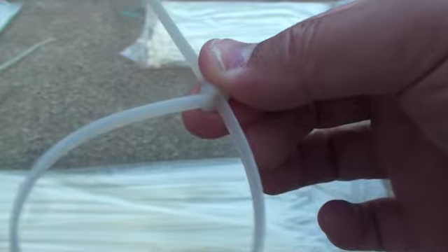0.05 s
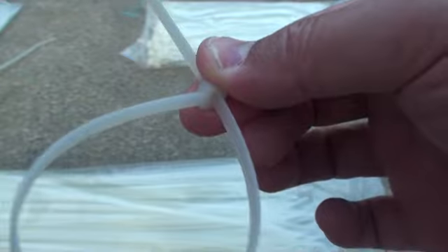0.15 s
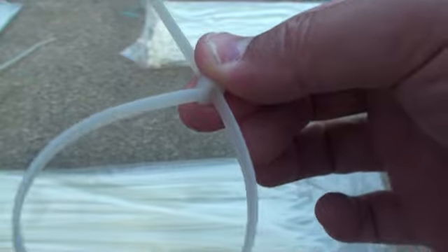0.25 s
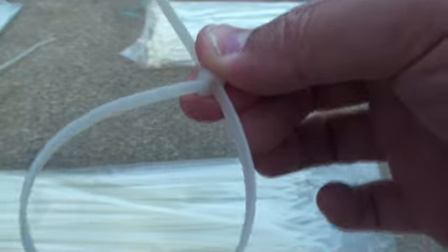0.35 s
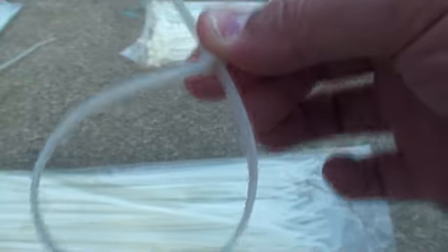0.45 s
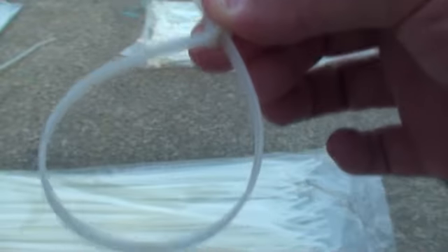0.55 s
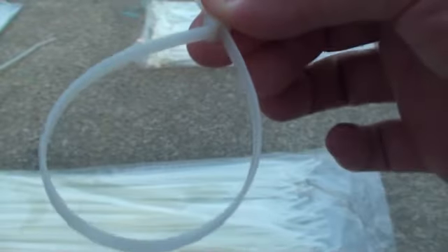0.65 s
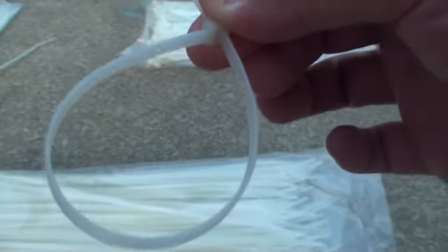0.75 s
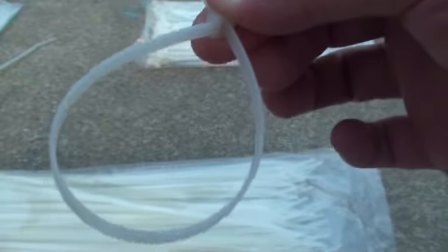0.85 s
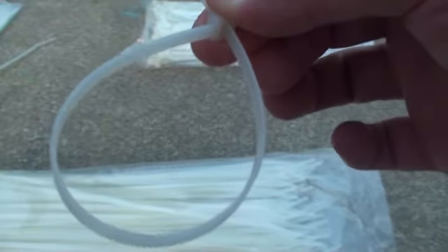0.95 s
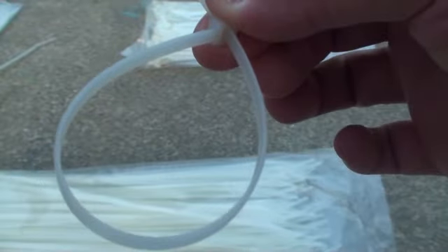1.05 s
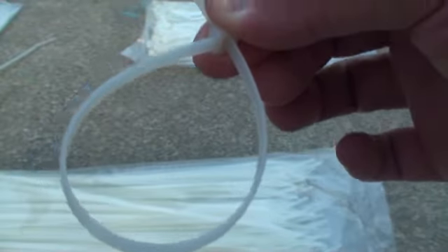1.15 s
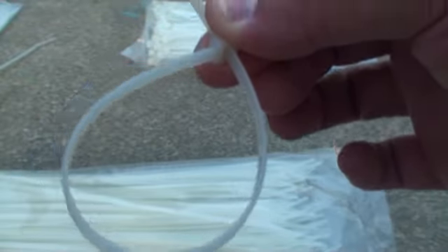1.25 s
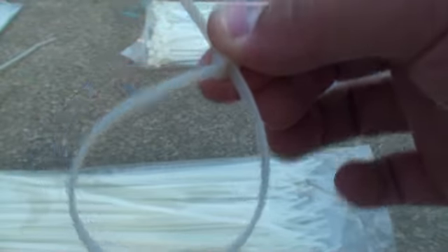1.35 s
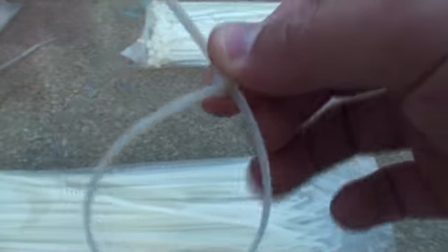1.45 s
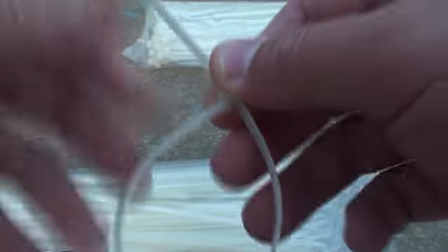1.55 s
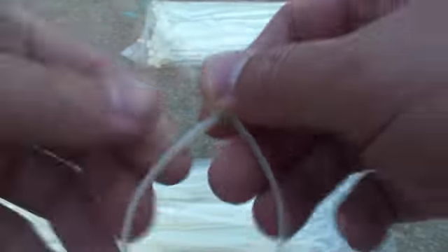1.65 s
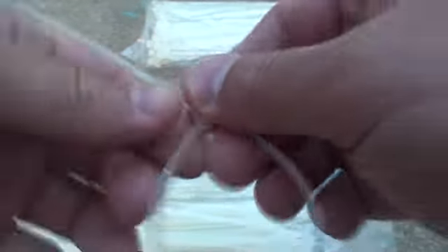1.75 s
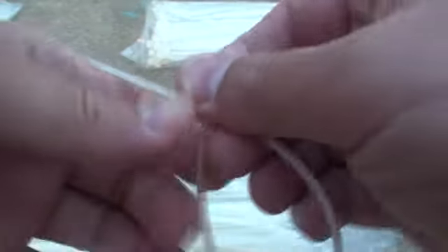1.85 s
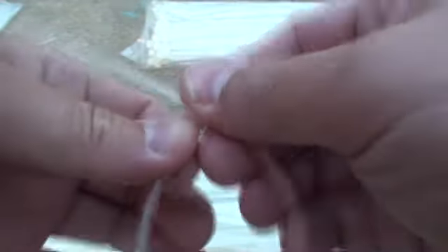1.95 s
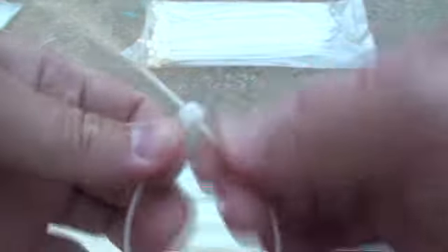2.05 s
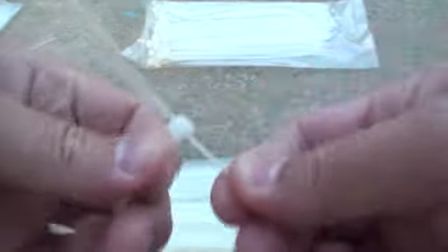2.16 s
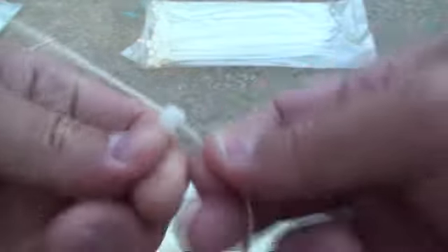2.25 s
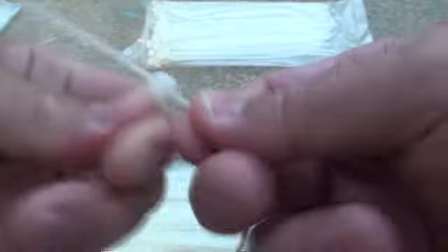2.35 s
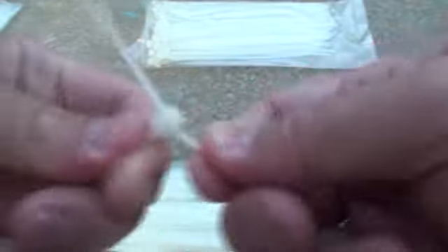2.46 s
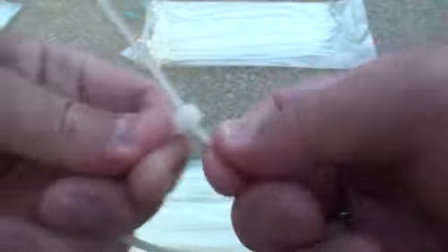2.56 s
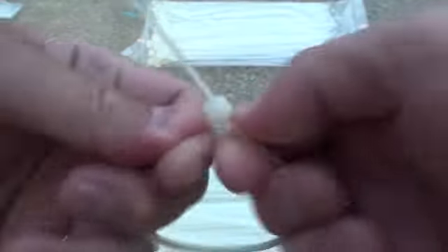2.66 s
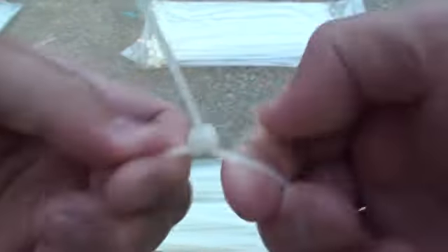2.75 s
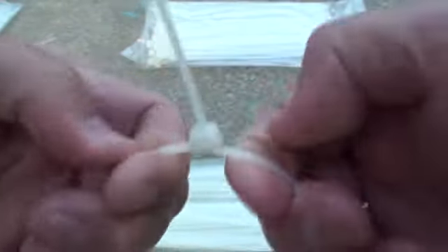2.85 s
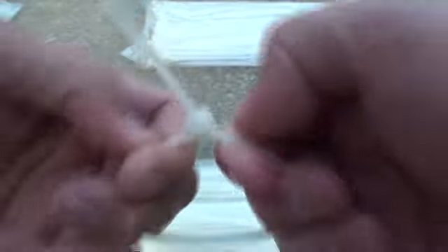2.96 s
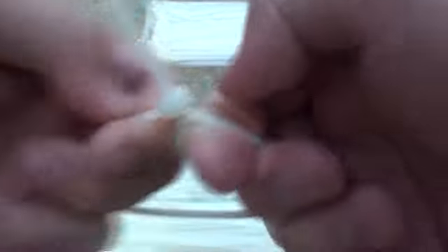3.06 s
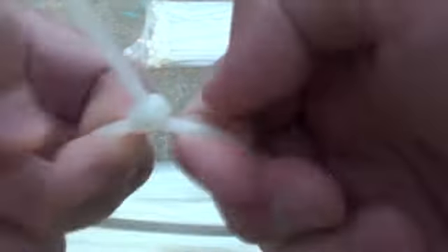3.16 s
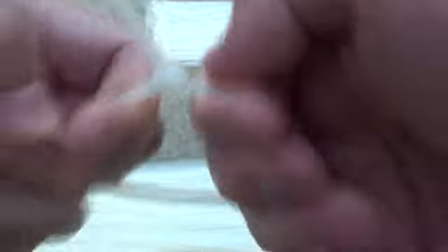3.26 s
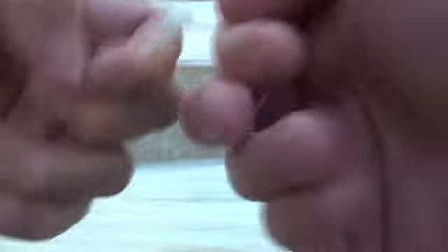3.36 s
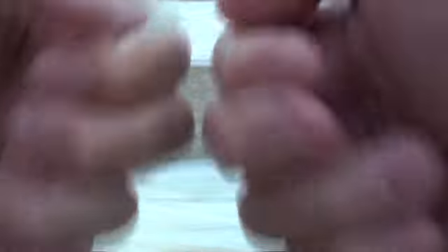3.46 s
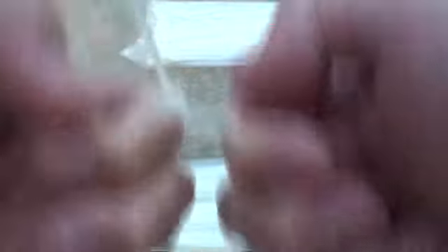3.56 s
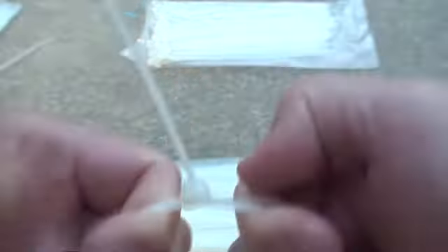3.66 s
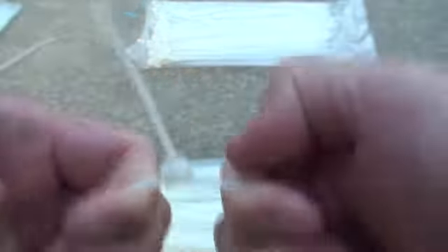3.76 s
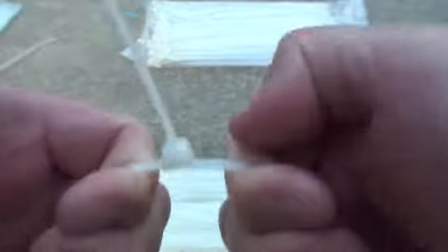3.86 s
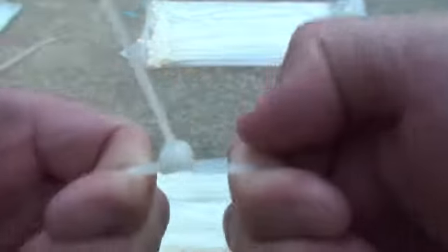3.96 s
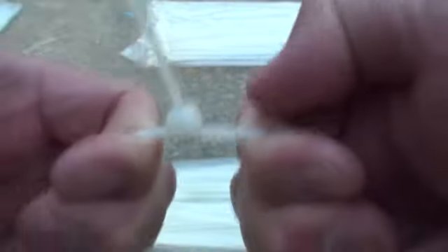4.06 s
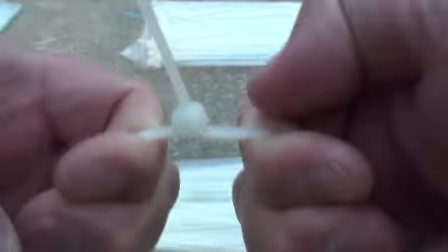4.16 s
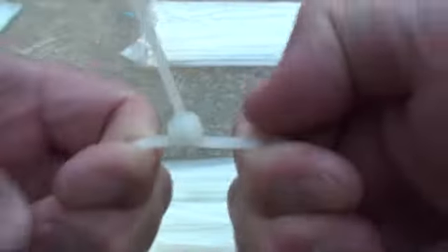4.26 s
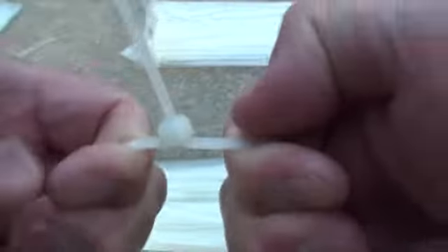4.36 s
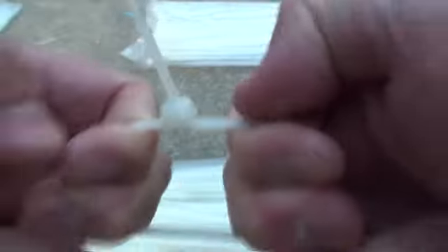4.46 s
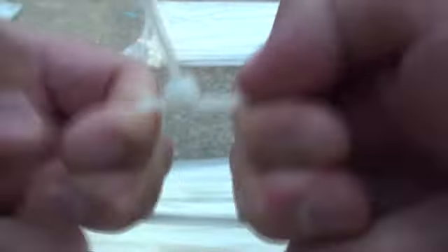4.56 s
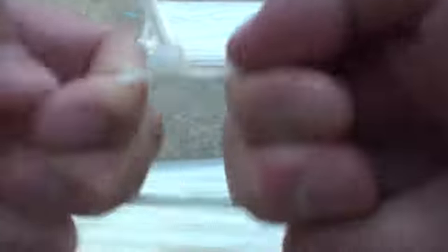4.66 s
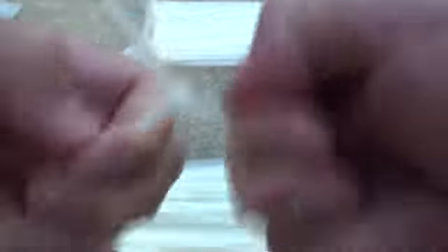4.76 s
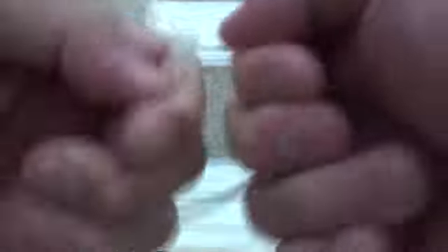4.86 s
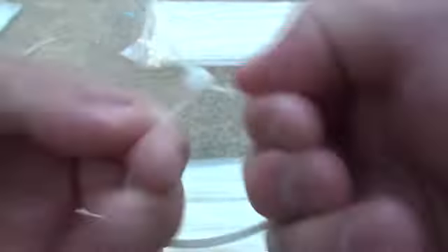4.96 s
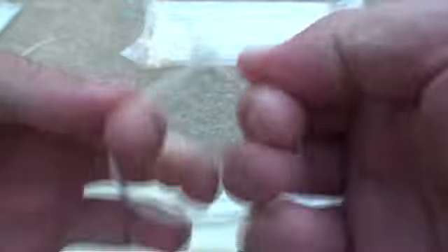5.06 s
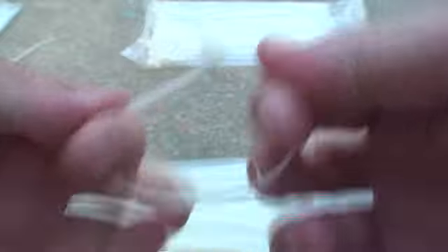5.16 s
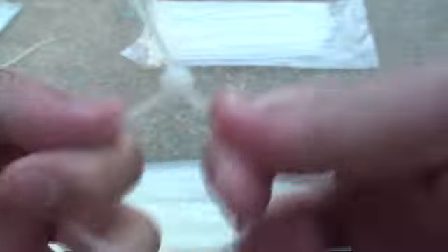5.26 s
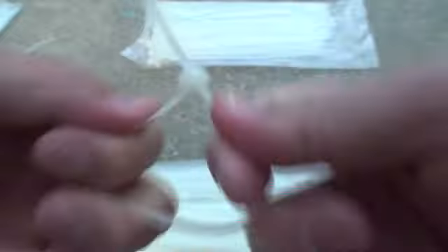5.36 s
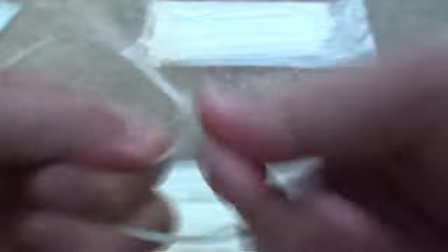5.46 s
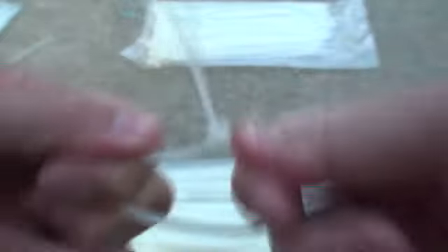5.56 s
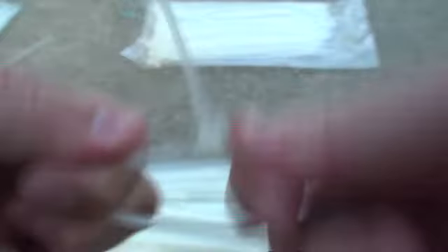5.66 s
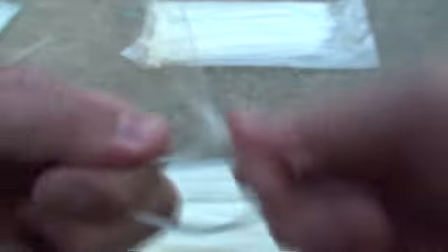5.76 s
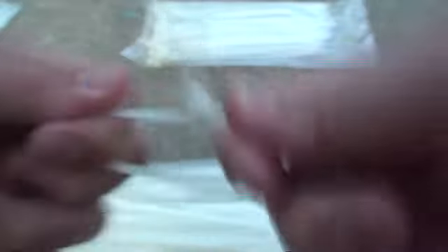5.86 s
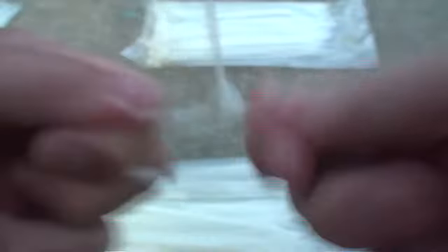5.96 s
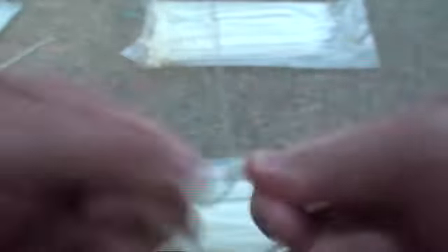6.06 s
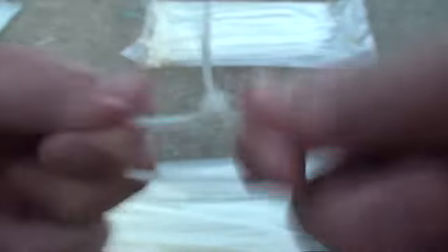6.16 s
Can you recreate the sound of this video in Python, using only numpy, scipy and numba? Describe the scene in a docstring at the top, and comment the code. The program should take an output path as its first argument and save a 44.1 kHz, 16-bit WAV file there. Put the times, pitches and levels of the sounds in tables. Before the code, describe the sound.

Hard plastic teeth snap rapidly in five separate pulls during the first second and a half, dry and treble-heavy near the microphone. Quiet skin-on-nylon rubbing follows, with a brief tight zip, a clear finger knock, dull little bumps and a sharp strap flick trailing hiss. A low hum and gentle wash stay steady underneath, with a far bird repeating burrs and thin rising whistles in the second half.

```python
"""A nylon zip tie is pulled through its head close by: the pawl snaps over the teeth in short bursts, each tooth
striking a bank of damped resonances. Fingers tap, bump and flick the strap (dying filtered noise) and rub it
(grainy noise with a bright band). Behind lie a low machine hum (resonant noise), the wash of the surroundings
(coloured noise), a far songbird and soft hoots (gliding or steady tones mixed with narrow noise)."""
import sys
import numpy as np
from scipy import signal
from scipy.fft import rfft, irfft
from scipy.io import wavfile
from scipy.ndimage import uniform_filter1d
from numba import njit

SR = 44100
rng = np.random.default_rng(int(sys.argv[2]) if len(sys.argv) > 2 else 0)


def generate_wav(sig):
    """Save sig (samples, or channels by samples) to the path in sys.argv[1] as 16-bit PCM at SR."""
    pcm = np.round(np.clip(np.atleast_2d(sig).T, -1, 1) * 32767).astype(np.int16)
    wavfile.write(sys.argv[1], SR, pcm)


N = 273861
LEAD_S = .01  # head start of the close sounds, so a click just before time zero still rings out


def undb(db):
    """Decibels to gain."""
    return 10 ** (np.asarray(db) / 20)


def level(x, rms_db):
    """Scale to an rms level."""
    return x * undb(rms_db) / np.sqrt(np.mean(x ** 2))


def pan(x, pan_db):
    """One signal on two channels, left louder by pan_db."""
    return x * undb(np.array([[pan_db], [-pan_db]]) / 2)


def pair(length, like):
    """Left and right noise with the given likeness, 0-1."""
    mid, side = rng.standard_normal((2, length))
    like = np.clip(like, 0, 1)
    return np.sqrt((1 + like) / 2) * mid + np.sqrt((1 - like) / 2) * side * np.array([[1], [-1]])


def add(out, x, start_s):
    """Mix x into out from start_s on, cropped to fit."""
    i = int(round(start_s * SR))
    a, b = max(i, 0), min(i + x.shape[-1], out.shape[-1])
    out[..., a:b] += x[..., a - i:b - i]


def walk(rate_hz):
    """Random levels held 1 / rate_hz and smoothed twice; spread near 1."""
    hold = int(SR / rate_hz)
    steps = np.repeat(rng.standard_normal(N // hold + 1), hold)
    return 2.3 * uniform_filter1d(uniform_filter1d(steps, hold), hold)[:N]


@njit
def svf(x, hz, q):
    """State-variable band-pass with a moving centre, gain 1 there."""
    y, band, low, damping = np.empty(len(x)), 0., 0., 1 / q
    for i in range(len(x)):
        g = np.tan(np.pi * hz[i] / SR)
        v = (band + g * (x[i] - low)) / (1 + g * (g + damping))
        band, low, y[i] = 2 * v - band, low + 2 * g * v, damping * v
    return y


def resonate(x, hz, q):
    """Band-pass with a fixed centre."""
    return svf(x, np.full(len(x), 1. * hz), 1. * q)


def mode(f, hz, width_hz, db):
    """Frequency response of one damped resonance."""
    return undb(db) * 1j * f * width_hz / (hz ** 2 - f ** 2 + 1j * f * width_hz)


def ratchet():
    """Each tooth gives two blows to the damped head: the pawl slips off, then lands in the next gap and bounces."""
    # resonances of the head before grip and scatter: centre_hz, width_hz, relative_db
    head = [(1100, 560, -48), (2290, 900, -24), (4100, 640, -32.5), (5440, 600, 2.5), (7070, 1380, 9.5),
            (9470, 1350, 15), (11200, 2100, 7.5), (12500, 1380, -3.3), (14600, 1200, -9.5)]
    # the strap loop recoils against the head: centre_hz, width_hz, relative_db
    loop = (300, 400, -38)
    # pulls of the strap: mean click_energy_db, mean flight_ms from slip to landing,
    # grip (factor on the head's resonances), [times_s at which the pawl clears a tooth]
    pulls = [(6, .44, 1.048, [-.001, .0153, .0312, .048, .0684, .0907, .1137, .1378, .1621, .1873, .2141, .2427, .272, .3064]),
             (6, .44, 1.05, [.4287, .4473, .4649, .4838]),
             (6, .46, 1.05, [.8043, .8417, .8589, .8741, .8888, .9031, .9204, .9405]),
             (5.5, 0.5, 1.05, [1.1334, 1.1551, 1.1721, 1.1891]),
             (5.5, 0.4, 1.046, [1.3028, 1.316, 1.3283, 1.34, 1.3527, 1.3673]),
             (3, .14, 0.934, [2.4111, 2.417, 2.4239, 2.4371, 2.4461, 2.4564, 2.4669, 2.4789])]
    slip_db, slip_corner_hz = -4, 8470
    bounce_ms, bounce_db = .1, -10.5
    tooth_scatter_db, head_scatter_db, flight_scatter = .8, 2.2, .09  # flight: in natural log

    out = np.zeros(N + int(LEAD_S * SR))
    f = np.arange(257) * SR / 512
    # the slip is a light, sharp touch that hardly stirs the low modes
    slip = undb(slip_db) * f ** 2 / np.hypot(f ** 2, slip_corner_hz ** 2)
    landing = 1 + undb(bounce_db) * np.exp(-2j * np.pi * f * bounce_ms / 1000)
    for energy_db, flight_ms, grip, times_s in pulls:
        for tooth_s in times_s:
            harder, longer, *draws = rng.standard_normal(len(head) + 2)
            ring = -mode(f, *loop)
            for (hz, width_hz, db), draw in zip(head, draws):
                ring = ring + mode(f, grip * hz, width_hz, db + head_scatter_db * draw)
            flight_s = flight_ms / 1000 * np.exp(flight_scatter * longer)
            blows = slip + np.exp(-2j * np.pi * f * flight_s) * landing
            click = irfft(ring * blows)[:256]
            gain = undb(energy_db + tooth_scatter_db * harder) / np.linalg.norm(click)
            add(out, click * gain, tooth_s + LEAD_S)
    return pan(out, pan_db=0.64)


def knocks(rows, pan_db, count):
    """Dying noise bursts (start_s, peak_db, hz, q, t60_s) in one resonance, passed count times for steeper skirts."""
    out = np.zeros(N + int(LEAD_S * SR))
    t = np.arange(SR // 16) / SR
    for start_s, peak_db, hz, q, t60_s in rows:
        x = rng.standard_normal(len(t)) * undb(-60 * t / t60_s)
        for _ in range(count):
            x = resonate(x, hz, q)
        add(out, x * undb(peak_db) / np.abs(x).max(), start_s + LEAD_S)
    return pan(out, pan_db)


def in_bands(hits, bands):
    """Every hit sounds in every band."""
    return [(s, db + band_db, hz, q, t60_s) for s, db in hits for hz, band_db, q, t60_s in bands]


def finger_taps():
    """Fingertips and strap knock, left of the middle: one broad noise burst each."""
    # taps: start_s, peak_db before panning, centre_hz
    tap_rows = [(1.514, -40, 10100), (2.078, -34.5, 3380), (2.908, -41.5, 4500), (3.048, -36, 1300),
                (3.345, -21.5, 2240), (4.825, -35.5, 2735), (5.04, -44, 1985), (5.593, -39, 5000),
                (5.676, -25, 4260), (6.0048, -27.5, 2860), (6.0165, -33, 3400), (6.158, -37.5, 2200),
                (6.188, -43, 7500)]
    q, t60_s = 0.8, 0.0037
    return knocks([(*tap, q, t60_s) for tap in tap_rows], pan_db=5.5, count=1)


def dull_bumps():
    """Dull bumps near the microphone: each is a noise burst in two bands."""
    # bumps: start_s, level_db
    bump_rows = [(5.438, -36), (5.462, -34), (5.479, -38.5)]
    # bands of a bump: centre_hz, peak_db relative to the bump's level, q, t60_s
    bump_bands = [(965, -1.5, 1.5, 0.0076), (167, 1.5, 0.84, 0.017)]
    return knocks(in_bands(bump_rows, bump_bands), pan_db=1.5, count=3)


def strap_flicks():
    """The free end of the strap flicks past the fingers and rebounds: noise bursts in two bands."""
    # flick and rebound: start_s, level_db
    flick_rows = [(5.6135, -13), (5.628, -29)]
    # bands of a flick: centre_hz, peak_db relative to the flick's level, q, t60_s
    flick_bands = [(11700, 2.3, 0.79, 0.013), (3750, -13.5, 1.6, 0.01)]
    return knocks(in_bands(flick_rows, flick_bands), pan_db=3.4, count=3)


def surroundings(near):
    """Direct sound, single echoes and diffuse tails; hands and walls stay put, so every click gets the same ones."""
    # reflections from palms and ground: delay_ms, gain_db before the high-pass
    echoes = [(1.5, -18), (2.6, -21.5)]
    # diffuse tails from fingers, surroundings and a rough wall:
    # start_ms, t60_ms, energy_db before the high-pass, left-right likeness (0-1)
    tails = [(0.896, 12.3, -6.5, 0.84), (4.93, 187, -24.5, .6), (20.8, 25, -27.5, 0.7)]
    reflect_hz = 4000  # hands are small: they throw back the treble only

    t = np.arange(SR // 4) / SR
    response = np.zeros((2, len(t)))
    for delay_ms, db in echoes:
        response[:, int(delay_ms * SR / 1000)] += undb(db)
    for start_ms, t60_ms, db, like in tails:
        tail = pair(len(t), like) * undb(-60000 * t / t60_ms)
        tail *= undb(db) / np.linalg.norm(tail, axis=1, keepdims=True)
        add(response, tail, start_ms / 1000)
    response = signal.sosfilt(signal.butter(2, reflect_hz, "high", fs=SR, output="sos"), response)
    response[:, 0] += 1  # direct sound
    lead = int(LEAD_S * SR)
    return np.array([signal.fftconvolve(c, h)[lead:][:N] for c, h in zip(near, response)])


def rubs():
    """Uneven stick-slip grains of skin on nylon: a broad hiss with a brighter band of its own in each scuff."""
    # scuffs: start_s, length_s, level_db before the swell, bright_centre_hz
    scuff_rows = [(1.83, 0.14, -57, 7000), (1.936, 0.13, -55, 7140), (2.05, 0.064, -48.5, 10000),
                  (2.129, 0.061, -55.5, 7550), (2.173, 0.17, -46, 6240), (2.49, 0.15, -55, 8900),
                  (2.761, 0.13, -53, 8200), (2.862, 0.095, -58, 6000), (3.185, .105, -60.5, 5500),
                  (3.433, 0.17, -46.5, 7700), (3.584, .18, -54.5, 5600), (3.897, 0.088, -62.5, 5060),
                  (4.952, 0.19, -56.5, 6650), (5.093, 0.11, -57.5, 7160), (5.186, 0.19, -48.5, 9650),
                  (5.991, 0.08, -53, 7600), (6.153, .055, -56, 6400)]
    # the strap hisses through the fingers after the flick: loudest_s, rise_s, fall_s
    slide_times = (5.622, .006, .12)
    # same hiss: level_db before the swell, bright_centre_hz
    slide_tone = (-44, 10800)
    rise_share, broad_db, grain_db = 0.43, 2.0, 2.2  # broad_db: hiss relative to bright band

    out = np.zeros((2, N))
    grains = pair(N, like=.8) * undb(grain_db * walk(500) + 0.99 * walk(60))
    scuffs = [(s + rise_share * n, rise_share * n, (1 - rise_share) * n, db, hz) for s, n, db, hz in scuff_rows]
    for loudest_s, rise_s, fall_s, db, hz in scuffs + [(*slide_times, *slide_tone)]:
        swell = np.linspace(0, 1, int(rise_s * SR)) ** .8
        fade = np.linspace(1, 0, int(fall_s * SR)) ** 1.3
        shape = np.r_[swell, fade]
        first = int((loudest_s - rise_s) * SR)
        part = grains[:, first:first + len(shape)]
        bright = np.array([resonate(g, hz, 2.5) for g in part])
        broad = signal.sosfilt(signal.butter(2, .35 * hz, "high", fs=SR, output="sos"), part)
        hiss = level(bright, 0) + level(broad, broad_db)
        add(out, shape * level(hiss, db), loudest_s - rise_s)
    return out


def notes(table, bend, q, clear_db, like):
    """Gliding or steady notes, partly blurred by distance into narrow noise; moving air breaks them up."""
    # table: start_s, length_s, from_hz, to_hz, level_db before shaping; clear_db: sine peak over blur rms
    out = np.zeros((2, N))
    for start_s, length_s, from_hz, to_hz, db in table:
        u = np.linspace(0, 1, int(length_s * SR))
        hz = from_hz + (to_hz - from_hz) * u ** bend
        blur = np.array([svf(svf(c, hz, q), hz, q) for c in pair(len(u), like)])
        clear = undb(clear_db) * np.sin(2 * np.pi * np.cumsum(hz) / SR)
        shape = np.abs(np.sin(np.pi * u)) ** .5
        add(out, shape * level(level(blur, 0) + clear, db), start_s)
    return out * undb(1.5 * walk(50))


def birds():
    """Blurred burrs and short calls, thin whistles that glide fast and then settle, and low steady hoots."""
    # song phrases: start_s, burr_hz, burr_db, whistle_from_hz, whistle_to_hz, whistle_db
    phrases = [(2.65, 2370, -64, 3150, 3510, -64.5), (3.33, 2400, -60, 3400, 3640, -61.5),
               (3.835, 2320, -62, 3160, 3640, -64), (4.255, 2600, -63, 3220, 3700, -65),
               (4.64, 2570, -61.5, 3250, 3690, -61), (5.0, 2610, -57, 3180, 3640, -62),
               (5.41, 2400, -62.5, 3080, 3510, -61), (5.79, 2470, -64, 3480, 3230, -60)]
    # short single calls among the phrases, some sounding over them: start_s, length_s, pitch_hz, level_db
    calls = [(3.469, 0.086, 2350, -54.5), (3.629, 0.12, 2660, -58.5), (5.455, .045, 3130, -58),
             (5.641, 0.099, 3070, -57.5), (6.04, 0.11, 3040, -57.5)]
    # soft low hoots: start_s, length_s, pitch_hz, level_db
    hoot_rows = [(.24, .081, 528, -57), (.36, 0.12, 526, -57.5), (.49, .2, 508, -57),
                 (1.09, 0.13, 533, -57.5), (3.09, .14, 540, -52.5), (3.6, 0.073, 540, -57.5)]
    burr_s, burr_rise = 0.15, 1.04  # rise: end over start pitch
    whistle_after_s, whistle_s = .1, .18

    burrs = [(s, burr_s, hz, hz * burr_rise, db) for s, hz, db, *_ in phrases]
    steady_calls = [(s, n, hz, hz, db) for s, n, hz, db in calls]
    whistles = [(s + whistle_after_s, whistle_s, *glide) for s, _, _, *glide in phrases]
    hoots = [(s, n, hz, hz, db) for s, n, hz, db in hoot_rows]
    return (notes(burrs + steady_calls, bend=0.59, q=4.8, clear_db=-10, like=0.77)
            + notes(whistles, bend=.5, q=15.0, clear_db=-1, like=0.7)
            + notes(hoots, bend=1, q=13.0, clear_db=2.1, like=.88))


def machine_hum():
    """Noise through one resonance twice: a low hum that wavers, alike on both sides."""
    hum_hz, width_hz = 133.7, 34  # width of each pass
    q = hum_hz / width_hz
    return level(resonate(resonate(rng.standard_normal(N), hum_hz, q), hum_hz, q), -54.5)


def wash():
    """Steady surroundings: coloured noise, bass more alike on both sides, drifting slowly in level."""
    # mid spectrum: frequency_hz, relative density_db (per Hz)
    mid_rows = [(12, -53), (20, -12), (105, -2), (135, -1), (174, -10), (218, -11.5), (352, -20),
                (552, -22), (601, -24.5), (774, -22), (2900, -32.5), (10300, -44), (15300, -42),
                (16600, -70)]
    # side relative to mid: frequency_hz, side_minus_mid_db
    side_rows = [(60, -18.5), (110, -25.5), (200, -18), (380, -4.5), (700, -2.5), (1290, -1), (2380, -1.5),
                 (4400, -3.5), (8120, -2), (15000, -18.5)]

    log_f = np.log(np.arange(1, N // 2 + 2) * SR / N)
    mid_hz, mid_db = np.transpose(mid_rows)
    side_hz, side_db = np.transpose(side_rows)
    colour_db = np.interp(log_f, np.log(mid_hz), mid_db)
    side_colour_db = colour_db + np.interp(log_f, np.log(side_hz), side_db)
    mid = irfft(rfft(rng.standard_normal(N)) * undb(colour_db), N)
    side = irfft(rfft(rng.standard_normal(N)) * undb(side_colour_db), N)
    return level(mid + side * np.array([[1], [-1]]), -46) * undb(.5 * walk(1.5))


def scene():
    """Hands close by, the rest far off."""
    near = ratchet() + finger_taps() + dull_bumps() + strap_flicks()
    return surroundings(near) + rubs() + birds() + machine_hum() + wash()


def record(dry):
    """The recorder rounds the click peaks and cuts the top."""
    top_hz = 16200
    rounded = np.tanh(1.5 * dry) / 1.5
    return signal.sosfilt(signal.ellip(8, .2, 60, top_hz, fs=SR, output="sos"), rounded)


dry = scene()
out = record(dry)
generate_wav(out)
```